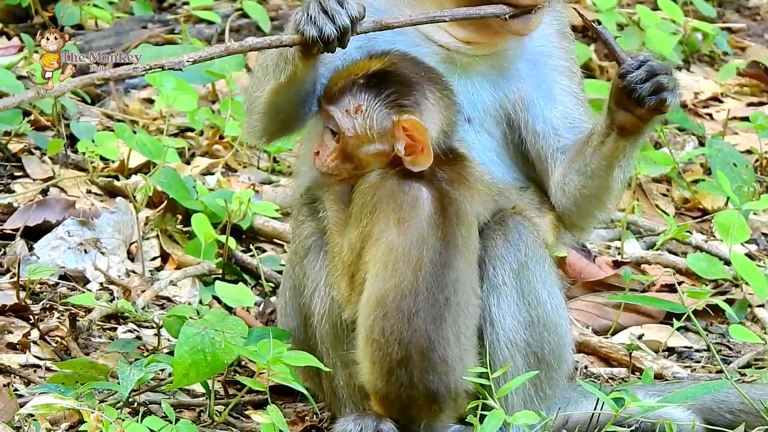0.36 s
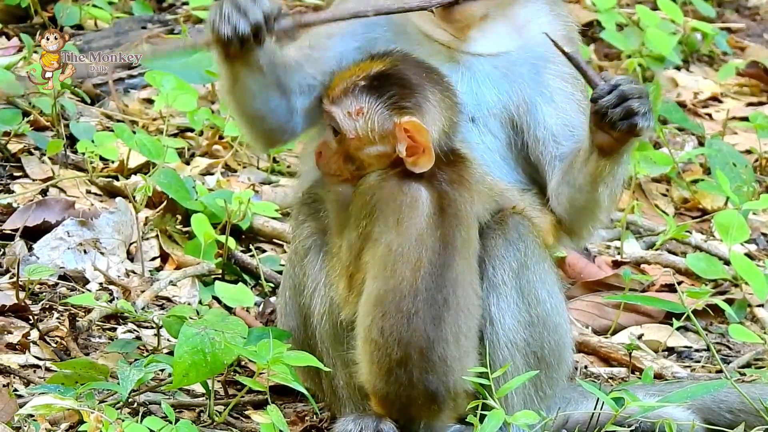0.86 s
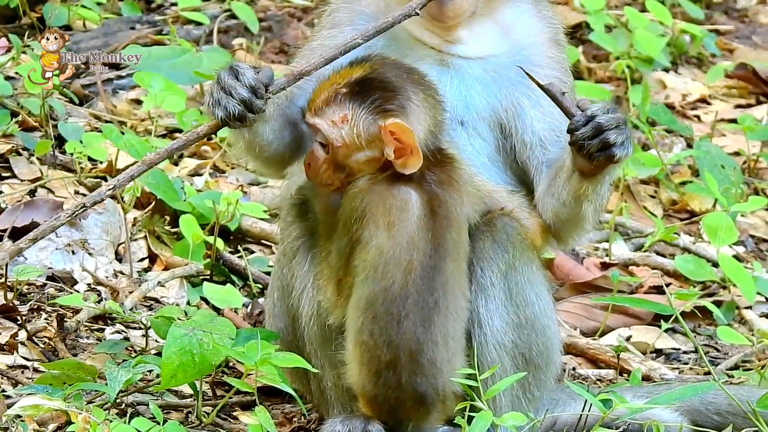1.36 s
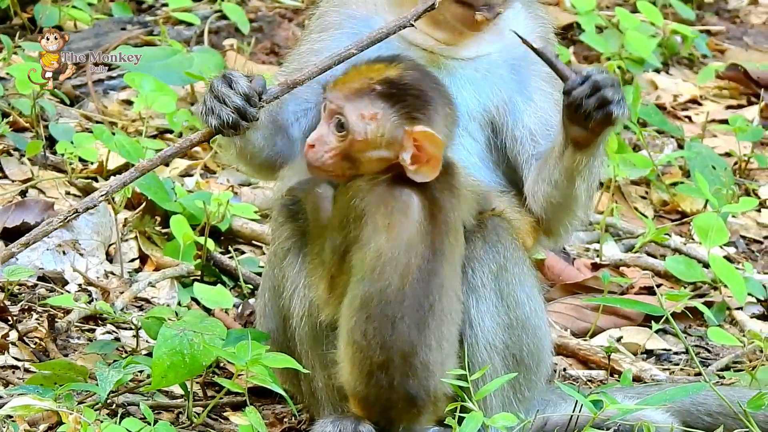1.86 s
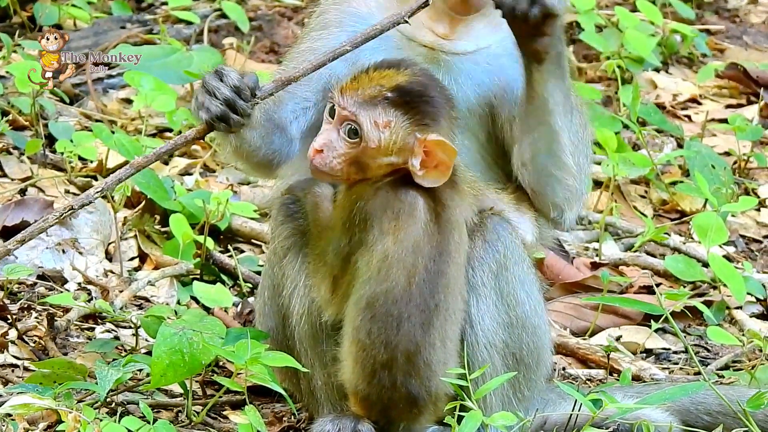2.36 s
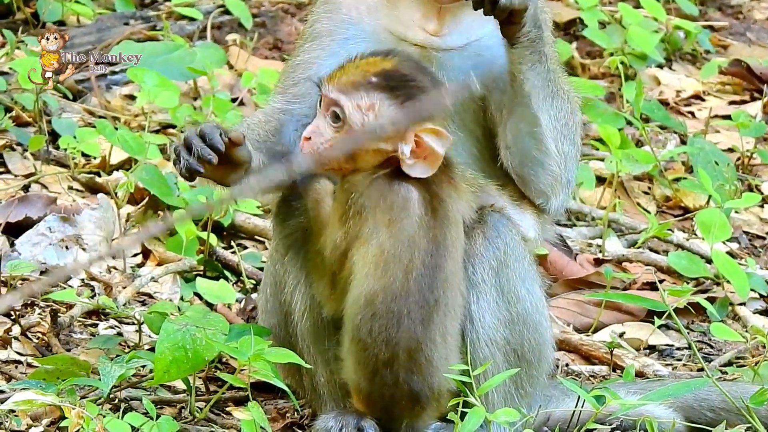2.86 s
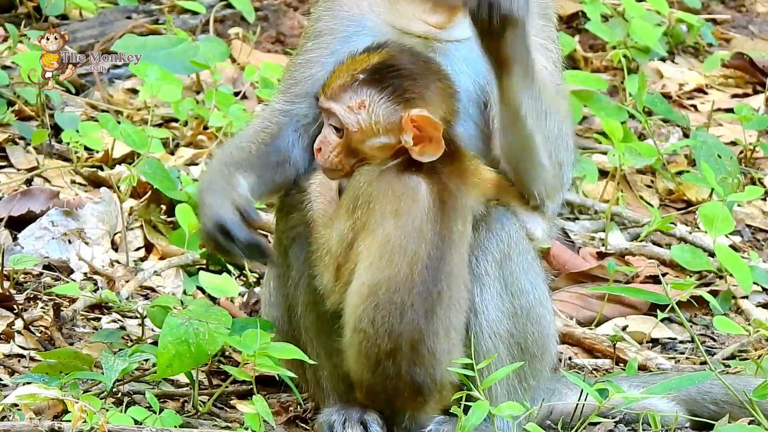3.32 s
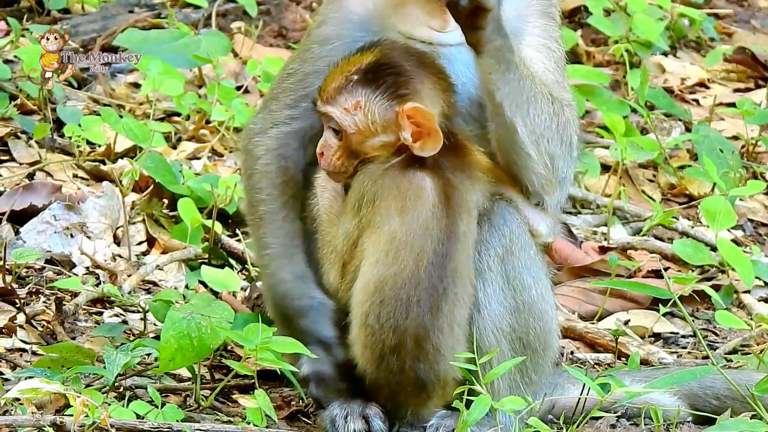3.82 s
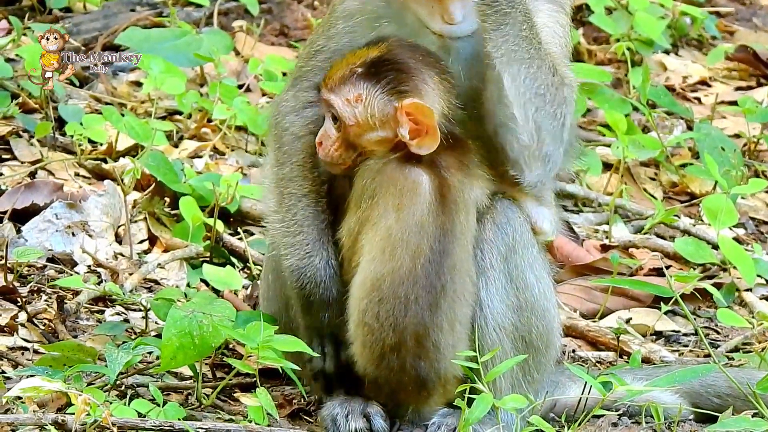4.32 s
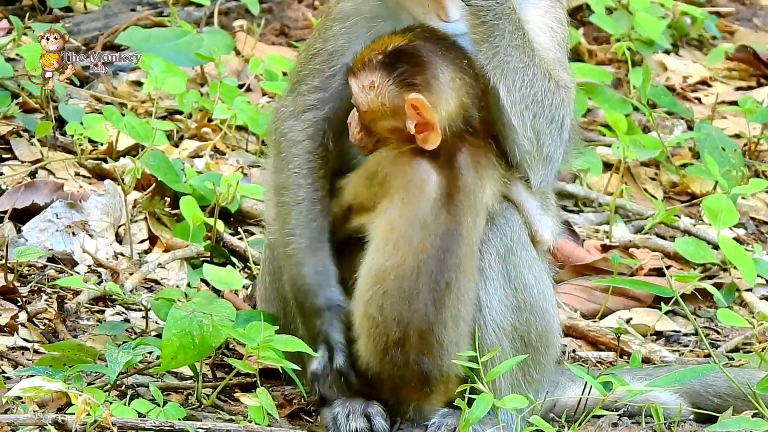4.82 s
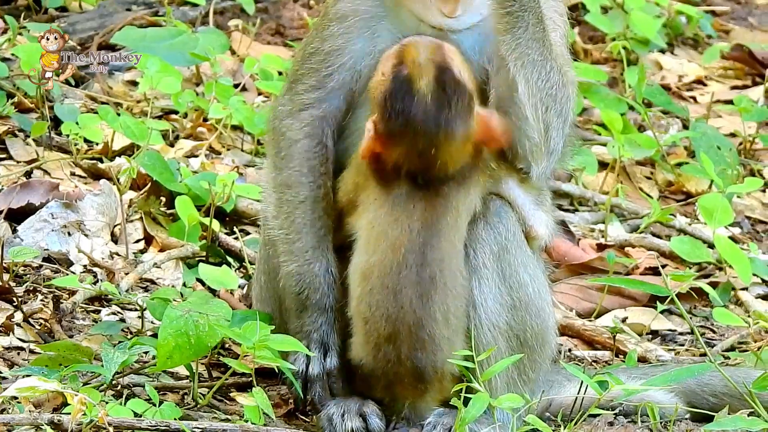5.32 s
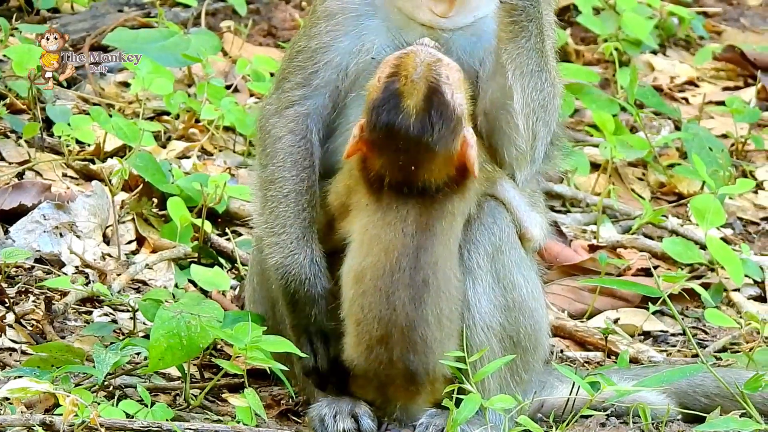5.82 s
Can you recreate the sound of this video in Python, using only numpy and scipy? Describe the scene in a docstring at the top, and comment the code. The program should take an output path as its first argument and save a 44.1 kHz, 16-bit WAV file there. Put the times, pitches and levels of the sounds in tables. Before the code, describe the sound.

Dry leaves rustle and crackle close by, with a loud twig snap near the start, faint bird whistles and low distant rumble outdoors.

```python
"""Monkey with a dry stick on a forest floor

Close to the microphones a monkey handles a stick: noise-made leaf litter rustles in swells, leaves and
twigs snap as dying noise bursts, and the ground gives one soft low bump of three ringing tones.
Some way off a bird glides through short whistles, echoed by the trees, over far rumble, background air and hiss.
The two microphone ports differ in level and phase, and their treble arrives about 10 ms late."""
import sys
import numpy as np
from scipy import signal
from scipy.fft import rfft, irfft, next_fast_len
from scipy.io import wavfile
from scipy.ndimage import uniform_filter1d, map_coordinates

SR = 44100
rng = np.random.default_rng(int(sys.argv[2]) if len(sys.argv) > 2 else 0)


def convert_level_to_amplitude(level_db):
    """Map a level in decibels to its linear amplitude factor."""
    exponent = np.asarray(level_db, float) / 20
    return 10 ** exponent


def digitize_waveform(pressure):
    """Quantize a signal to 16-bit integers and store it at the path in sys.argv[1].

    Rows of a 2-D input are taken as channels; values are limited to [-1, 1].
    """
    field = np.atleast_2d(pressure).T
    bounded = np.clip(field, -1, 1)
    quanta = np.round(bounded * 32767).astype(np.int16)
    wavfile.write(sys.argv[1], SR, quanta)


N = 272477

# colour of crisp leaf contacts, in the rustle and after snaps: f/Hz, relative density/dB per Hz
CRISP_COLOUR = [(3900, -62), (4200, -7), (5170, -5.5), (6400, -0.5), (6970, -0.5), (8400, -11.5),
                (10000, -20.5), (12000, -31.5), (15800, -61)]


def unit(x):
    """Bring to rms 1."""
    return x / np.sqrt(np.mean(x ** 2) + 1e-20)


def along(points, hz):
    """Read a table of (Hz, value) points on a log frequency axis."""
    f, v = np.transpose(points)
    return np.interp(np.log(hz + 1), np.log(f + 1), v)


def curves(rows):
    """One value per sample for each column after the time."""
    s, *cols = np.transpose(rows)
    return [np.interp(np.arange(N) / SR, s, c) for c in cols]


def wobble(rate):
    """A smooth random curve, rate knots a second."""
    knots = rng.standard_normal(int(N * rate / SR) + 4)
    return map_coordinates(knots, [np.arange(N) * rate / SR])


def filtered(x, response):
    """Multiply the spectrum of x by a complex response of frequency."""
    n = x.shape[-1]
    m = next_fast_len(n + 4096)
    return irfft(rfft(x, m) * response(np.fft.rfftfreq(m, 1 / SR)), m)[..., :n]


def ports(pair, spectrum, spread=1):
    """Mix two unrelated signals into partly alike left and right; a spread under 1 narrows the source."""
    # likeness of the two microphone ports: f/Hz, correlation (1 = the same)
    likeness = [(40, 0.97), (150, 0.8), (330, 0.57), (800, 0.73), (2000, 0.77), (8000, 0.42), (11000, 0.16),
                (15000, 0.14)]

    def response(hz):
        turn = spread * np.arccos(np.clip(along(likeness, hz), 0, 1)) / 2
        return convert_level_to_amplitude(along(spectrum, hz)) * [np.cos(turn), np.sin(turn)]

    mid, side = filtered(pair, response)
    return np.array([mid + side, mid - side])


def patchy(patchy_db, size=256):
    """Two noises with shared patches of random gain; a larger size makes them narrower and longer."""
    z = signal.stft(rng.standard_normal((2, N + 2 * size)), nperseg=size)[2]
    field = rng.standard_normal(z.shape[1:])
    field = uniform_filter1d(field, size=4, axis=0)  # over frequency
    field = uniform_filter1d(field, size=6, axis=1)  # over time
    return signal.istft(z * convert_level_to_amplitude(patchy_db * unit(field)), nperseg=size)[1][:, :N]


def far():
    """Coloured noises: a swaying low distant rumble, soft background air and a thin steady top hiss."""
    # distant rumble: f/Hz, relative density/dB per Hz
    rumble_colour = [(20, -46), (28, -19), (40, -1), (81, 2), (167, 1), (260, -12), (340, -78)]
    # background air: f/Hz, relative density/dB per Hz
    air_colour = [(140, -9.5), (240, -3), (371, -2.5), (499, -4.5), (665, -4), (1190, -9.5), (1500, -9.5),
                  (2200, -14.5), (2860, -15.5), (4840, -120)]
    # top hiss: f/Hz, relative density/dB per Hz
    hiss_colour = [(5000, -21), (8500, -23), (10500, -6), (12700, -10.5), (15200, -14), (15800, -4)]
    # background level, with sudden dips as if a noise suppressor turned it down:
    # t/s, level before a 4 dB lift and a random sway/dB
    air_level = [(0.0, -53.5), (0.6, -56.5), (0.66, -54.5), (0.82, -52.5), (1.0, -54), (1.08, -58.5),
                 (1.17, -53.5), (1.24, -55.5), (1.44, -58), (1.7, -55.5), (1.95, -55.5), (2.05, -57),
                 (2.14, -55.5), (2.22, -60), (2.57, -59.5), (2.63, -54), (2.9, -57), (3.05, -54.5),
                 (3.2, -56), (3.6, -55.5), (3.68, -57.5), (3.85, -58), (4.05, -58), (4.2, -57), (4.44, -60),
                 (4.49, -53.5), (4.63, -54.5), (4.7, -61), (4.8, -55), (4.9, -56), (5.0, -55), (5.1, -54.5),
                 (5.62, -54.5), (5.78, -59), (5.9, -53.5), (6.17, -55.5)]
    rumble = unit(ports(rng.standard_normal((2, N)), rumble_colour))
    air = unit(ports(patchy(patchy_db=2.55, size=1024), air_colour))
    hiss = unit(ports(patchy(patchy_db=1.5), hiss_colour))
    rumble_db = -47 + 0.66 * wobble(6.6)
    air_db, = curves(air_level)
    air_db = air_db + 4.0 + 1.14 * wobble(12)
    return convert_level_to_amplitude(rumble_db) * rumble + convert_level_to_amplitude(air_db) * air + convert_level_to_amplitude(-62.5) * hiss


def rustle():
    """Many tiny leaf contacts, a few much larger than the rest, each crumbling for some milliseconds."""
    # how hard the leaf litter is stirred: t/s, crisp level before a 0.5 dB lift and flutter/dB
    stir = [(0.0, -51.5), (0.58, -46), (0.93, -46), (1.08, -44.5), (1.4, -48), (1.52, -40.5), (1.65, -30.5),
            (1.9, -38.5), (2.3, -42), (2.78, -47.5), (3.2, -46.5), (3.7, -45), (3.89, -40), (4.06, -38.5),
            (4.125, -33.5), (4.18, -42), (4.27, -39), (4.61, -44), (5.4, -48.5), (5.7, -47), (6.1, -45.5),
            (6.104, -37.5), (6.18, -32.5)]
    # duller part of the rustle: f/Hz, relative density/dB per Hz
    dull_colour = [(300, -28), (900, -15.5), (1500, -8), (2000, -4.5), (3000, -1.5), (4150, -1),
                   (4400, -33.5)]
    stir_db, = curves(stir)
    dull_db = -52 + 0.72 * (stir_db + 46.0)  # grows less than the crisp part
    sizes = convert_level_to_amplitude(4.2 * rng.exponential(1, N).clip(0, 3.2))
    contacts = (rng.random(N) < 450 / SR) * sizes  # about 450 a second
    crumble = convert_level_to_amplitude(-60 * np.arange(SR // 20) / SR / 0.008)  # falls 60 dB in 8 ms
    grain = 1 + .5 * unit(signal.fftconvolve(contacts, crumble)[:N])
    flutter_db = 0.8 * wobble(14) + 0.8 * wobble(40)
    crisp = unit(ports(grain * patchy(patchy_db=0.5), CRISP_COLOUR))
    dull = unit(ports(grain ** 0.69 * patchy(patchy_db=2.0, size=512), dull_colour))
    return convert_level_to_amplitude(stir_db + flutter_db + 0.5) * crisp + convert_level_to_amplitude(dull_db + 0.96 * flutter_db) * dull


def burst(spectrum, t60, tilt_db=0):
    """A coloured noise burst dying 60 dB in t60 s, peak short-time left rms 1, its onset 2 ms in."""
    t = np.arange(SR // 14) / SR - .002
    rise = 1 - np.exp(-t.clip(0) / 0.00024)
    noise = rng.standard_normal((2, len(t))) * rise * convert_level_to_amplitude(-60 * np.abs(t) / t60)
    # tilt in dB per octave about 6500 Hz, level above 8800 Hz
    tilted = [(hz, db + tilt_db * np.log2(min(hz, 8800) / 6500)) for hz, db in spectrum]
    x = ports(noise, tilted, spread=0.2)
    return x / np.sqrt(uniform_filter1d(x[0] ** 2, size=40).max())


def snaps():
    """Each snap of leaf or twig: a sharp crack, a short crumble after it and a duller knock."""
    # snaps close by: t/s, crack level/dB, brightness tilt/dB per octave, knock re crack before a 4 dB cut/dB
    snap_list = [(0.489, -30.5, -9, -1.5), (0.648, -37.5, 8, -24), (0.695, -34.5, 4, -2.5),
                 (1.1744, -25, -8, -5), (1.1808, -28.5, -5, -4.5), (1.2044, -40, -6, -1),
                 (1.4216, -8.5, -7, -19), (1.4692, -8.5, 1, -15.5), (1.4704, -12, -8, -21),
                 (1.4848, -12, -5, -22), (1.505, -34, 16, -13), (1.567, -24.5, 0, -10),
                 (1.5745, -25, -2, -13), (1.606, -18.5, 2, -12), (1.6507, -27, -7, -7),
                 (1.6555, -26, -7, -17), (1.632, -33, 0, -17), (1.6606, -15.5, -14, -14.5),
                 (1.692, -37, 2, -15), (1.719, -21, -16, -6), (1.729, -25, 4, -13), (1.7692, -21, -2, -19),
                 (1.7935, -36, 0, -15), (1.821, -26, -7, -20), (1.8686, -42, 3, -16), (1.93, -30, -6, -15),
                 (1.888, -47, -6, -1), (2.028, -32.5, 10, -23), (2.117, -26, -7, -24),
                 (2.174, -32, 0, -8.5), (2.254, -33.5, -2, -7.5), (2.341, -43, 0, -13),
                 (2.4685, -34, -1, -28), (2.559, -30.5, -3, -9), (2.6341, -30.5, -7, -14),
                 (2.781, -44.5, -16, 5), (3.02, -44, -4, 3), (3.427, -39, -8, -5), (3.6232, -35, -12, 0.5),
                 (3.658, -32.5, -10, -13), (3.706, -33, 3, -13), (3.762, -35, 13, -21),
                 (3.7824, -16.5, -4, -31), (3.793, -33, 3, -11), (3.799, -32, 2, -16), (3.849, -30, 0, -23),
                 (3.853, -37, -1, -19), (3.868, -26, -2, -11), (3.876, -23, -4, -22), (3.894, -39, 2, -15),
                 (3.913, -35, 0, -8), (3.922, -21.5, -1, -15), (3.928, -34, 0, -8), (3.957, -21, -9, -13),
                 (3.965, -28.5, 10, -5), (3.996, -18, -14, -17), (4.014, -35, 3, -5), (4.017, -35, 5, 2.5),
                 (4.027, -42, 2, -12), (4.0486, -27, -8, -6), (4.067, -27, -2, -8), (4.068, -21, -7, -6),
                 (4.0852, -21, 0, -9), (4.0883, -21.5, -8, -12.5), (4.103, -28, 8, -1),
                 (4.112, -28, -5, -5.5), (4.117, -24, -35, -10), (4.141, -20, 0, -10), (4.25, -31, -3, -17),
                 (4.2827, -37, 2, -10), (4.469, -39, 13, -15), (4.524, -33, -7, -7), (4.5683, -36, -2, -12),
                 (4.816, -40, 2, -15), (4.9512, -33.5, -15, -0.5), (5.325, -31.5, 2, -13),
                 (5.751, -35, -4, -4.5), (5.775, -31.5, 1, -10), (6.1059, -24.5, 11, -7),
                 (6.109, -20.5, 2, -26), (6.1138, -22, 5, -11), (6.156, -23, -19, -7.5)]
    # crack of a breaking twig: f/Hz, relative density/dB per Hz
    twig_colour = [(3950, -46), (4400, -11), (5240, -3), (6200, -2), (7200, 0.5), (8210, 0), (11100, -25),
                   (12300, -20), (15800, -50)]
    # crack of a leaf: f/Hz, relative density/dB per Hz
    leaf_colour = [(3900, -40), (4400, -14), (5300, -6), (6300, 0), (7200, -2), (8600, -11), (11000, -26),
                   (15800, -62)]
    # dull knock: f/Hz, relative density/dB per Hz
    knock_colour = [(500, -25), (1200, -7.5), (1800, -13), (2100, -2), (2700, -4), (3700, 0), (4150, 0.5),
                    (4400, -24)]
    twig_over_db = -13  # louder cracks are twigs
    twig_t60_s, leaf_t60_s, crumble_t60_s, knock_t60_s = 0.0035, 0.0055, 0.12, 0.064
    out = np.zeros((2, N + SR))
    for s, db, tilt_db, knock_db in snap_list:
        if db > twig_over_db:
            crack = burst(twig_colour, twig_t60_s, tilt_db)
        else:  # leaves vary in how long they crack
            crack = burst(leaf_colour, leaf_t60_s * convert_level_to_amplitude(rng.normal(0, 3.5)), tilt_db)
        crumble_db = -32.5 + 0.6 * (db + 21.5)
        crumble = convert_level_to_amplitude(crumble_db) * burst(CRISP_COLOUR, crumble_t60_s, tilt_db)
        ticks = np.repeat(rng.standard_normal(128), repeats=30)[:crack.shape[1]]  # 0.7 ms each
        crumble = crumble * convert_level_to_amplitude(3 * ticks - 1)
        knock = convert_level_to_amplitude(knock_db - 4.0) * burst(knock_colour, knock_t60_s)
        start = round((s - .002) * SR)
        out[:, start:][:, :crack.shape[1]] += convert_level_to_amplitude(db) * (crack + knock) + crumble
    return out[:, :N]


def bird():
    """Gliding whistles with soft ends, some hoarse; the trees return a lumpy, smeared echo."""
    # bird notes some way off, with faint echoes and tails among them:
    # start t/s, length/s, start f/Hz, end f/Hz, level/dB
    notes_and_tails = [(1.487, 0.027, 1620, 1610, -49), (1.509, 0.031, 1606, 1553, -36.5),
                       (1.526, 0.043, 1502, 1544, -32.5), (1.595, 0.035, 1520, 1560, -46),
                       (1.695, 0.044, 1527, 1579, -31), (1.747, 0.022, 1583, 1590, -49),
                       (1.836, 0.083, 1865, 1815, -45), (1.853, 0.054, 1565, 1580, -45.5),
                       (1.899, 0.033, 1864, 1940, -48), (1.964, 0.035, 1660, 1700, -45),
                       (1.965, 0.025, 1880, 1850, -44), (1.983, 0.029, 1820, 1860, -37.5),
                       (2.001, 0.027, 2114, 2400, -37.5), (2.019, 0.031, 2340, 2950, -38),
                       (2.05, 0.04, 2310, 2500, -47), (2.09, 0.081, 2790, 2700, -48.5),
                       (2.043, 0.049, 1754, 1735, -45.5), (2.226, 0.028, 1740, 1670, -43),
                       (2.241, 0.044, 1616, 1590, -30.5), (2.28, 0.21, 1912, 1913, -47.5),
                       (2.283, 0.071, 2040, 2086, -38.5), (2.329, 0.05, 1686, 1740, -42),
                       (2.363, 0.14, 2020, 2040, -47.5), (2.389, 0.055, 1680, 1720, -46.5),
                       (2.503, 0.26, 2043, 2000, -50.5), (2.59, 0.14, 1638, 1620, -49.5),
                       (2.699, 0.3, 1780, 1800, -53), (2.75, 0.17, 2040, 2050, -56),
                       (3.863, 0.013, 1340, 1340, -40), (5.833, 0.13, 1632, 1610, -49),
                       (5.89, 0.077, 2380, 2290, -47.5), (5.902, 0.095, 2700, 2800, -50),
                       (6.018, 0.03, 2930, 2960, -51)]
    song = np.zeros(N + SR)
    for s, length, from_hz, to_hz, db in notes_and_tails:
        glide_hz = to_hz - from_hz
        # whistles fainter than -34 dB and wider glides are hoarser
        rough = np.clip(0.055 * (-34 - db) + 0.001 * abs(glide_hz), 0, 1)
        u = np.arange(round(length * SR)) / (length * SR)
        # the hoarser and the wider the glide, the faster size and phase flicker
        flicker_per_s = 140 * rough + 0.6 * abs(glide_hz)
        knots = 2 + u * length * flicker_per_s
        a, b = [map_coordinates(v, [knots], mode="wrap") for v in rng.standard_normal((2, 128))]
        voice = np.sqrt(1 - rough) + np.sqrt(rough / 2) * (a + 1j * b)
        phase = 2 * np.pi * np.cumsum(from_hz + glide_hz * u) / SR
        soft_ends = np.sin(np.pi * u ** 0.9) ** 0.67
        song[round(s * SR):][:len(u)] += convert_level_to_amplitude(db) * soft_ends * (voice * np.exp(1j * phase)).real
    echo_db, echo_t60_s = -13.5, 0.7
    t = np.arange(SR) / SR
    fade = convert_level_to_amplitude(3 * wobble(35.0)[:SR] - 60 * t / echo_t60_s)
    trees = rng.standard_normal((2, SR)) * fade * (1 - np.exp(-t / 0.017))
    trees = trees + 7.8 * trees[0]  # nearly the same echo left and right
    trees = trees / np.linalg.norm(trees[0])
    echo = signal.fftconvolve(song[None, :N], trees, axes=1)[:, :N]
    return song[:N] + convert_level_to_amplitude(echo_db) * echo


def thump():
    """One soft, low bump on the ground: three tones ringing down together."""
    start_s, low_hz, level_db, t60_s = 6.131, 444, -36.5, 0.047
    t = (np.arange(N) / SR - start_s).clip(0)
    ring = np.sin(2 * np.pi * low_hz * t)
    ring += 1.05 * np.sin(2 * np.pi * 1.96 * low_hz * t)
    ring += 1.06 * np.sin(2 * np.pi * 3.1 * low_hz * t)
    return convert_level_to_amplitude(level_db - 60 * t / t60_s) * (1 - np.exp(-t / 0.0018)) * ring


def scene():
    """Everything around the microphones, far and near."""
    return far() + rustle() + snaps() + bird() + thump()


def roll_off(x):
    """The treble ends steeply here."""
    return signal.sosfilt(signal.butter(12, 15840, fs=SR, output="sos"), x)


def record(dry):
    """The ports differ in level and phase; the treble band is split off and comes late; peaks clip."""
    # balance of the ports: f/Hz, left over right level/dB
    left_louder = [(100, 1.7), (400, 0.3), (2300, 2.5), (4500, 0.5), (6300, 1), (9000, 1.6), (13000, -0.5)]
    # phase between the ports: f/Hz, left ahead of right/rad
    left_ahead = [(1000, .05), (4000, .25), (5000, .75), (6000, 1.1), (7000, 1.1), (9000, 1.3),
                  (11000, 1.6), (14000, 2.6)]
    split_hz, late_samples, clip_level = 4150, 449, 0.93
    half = np.array([[.5], [-.5]])  # shared between left and right

    def port_response(hz):
        return convert_level_to_amplitude(half * along(left_louder, hz)) * np.exp(1j * half * along(left_ahead, hz))

    x = filtered(dry, port_response)
    treble = filtered(x, lambda hz: np.clip((hz - split_hz) / 200 + .5, 0, 1))
    late_treble = np.pad(treble, [(0, 0), (late_samples, 0)], "reflect")[:, :N]
    mix = np.clip(x - treble + late_treble, -clip_level, clip_level)
    return roll_off(mix)


dry = scene()
out = record(dry)
digitize_waveform(out)
```